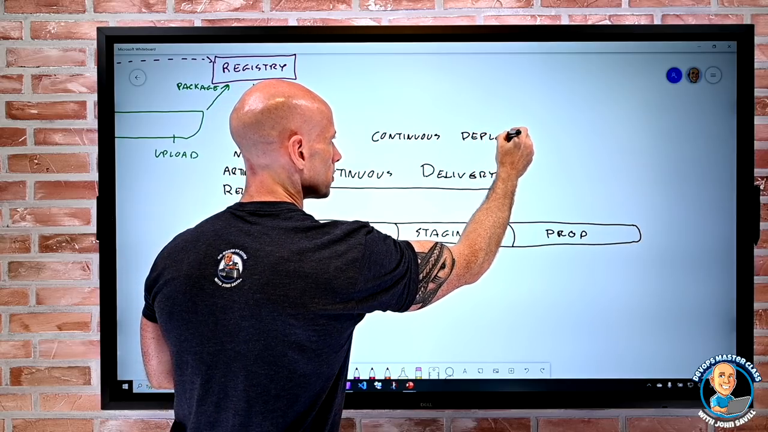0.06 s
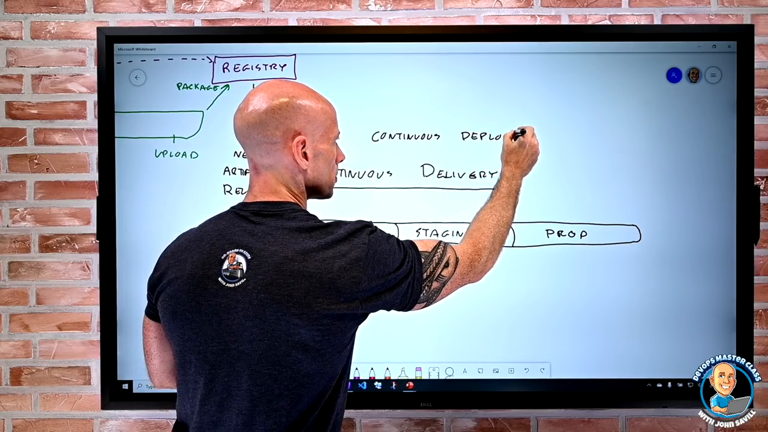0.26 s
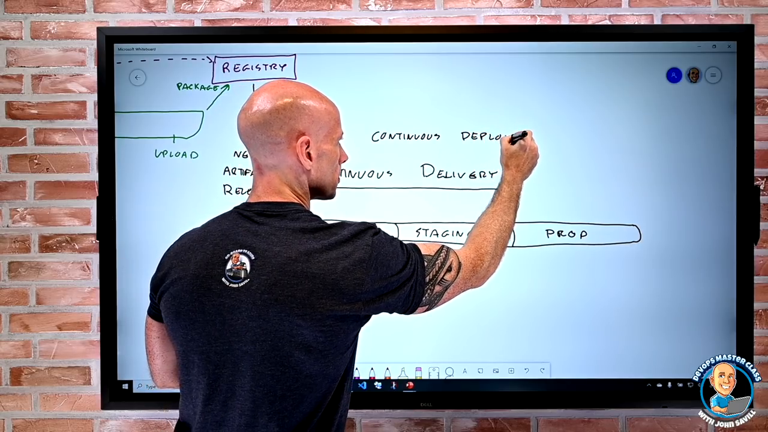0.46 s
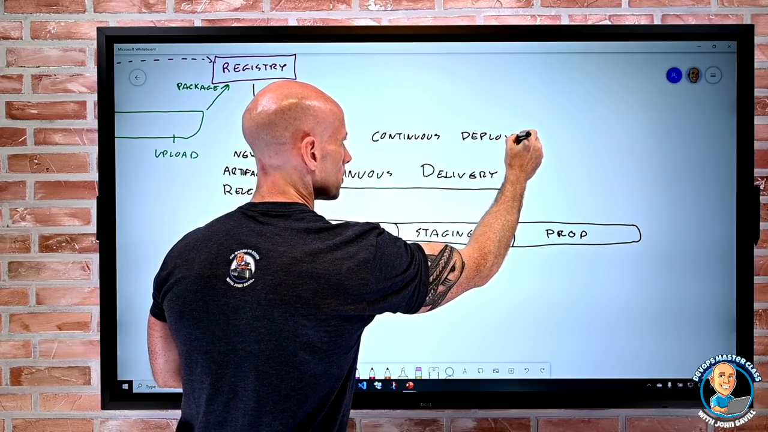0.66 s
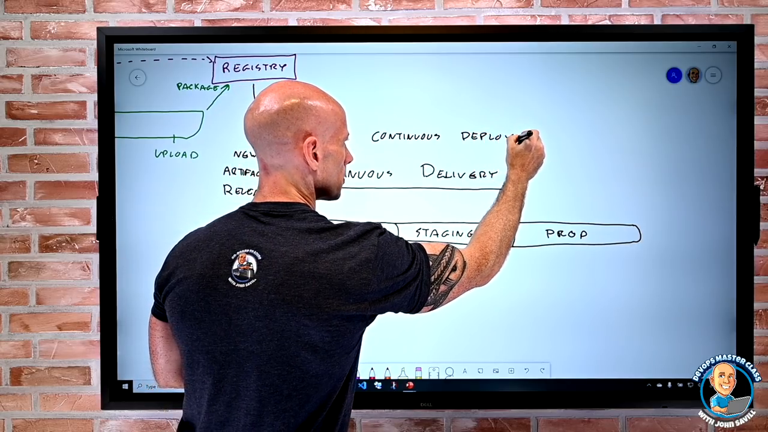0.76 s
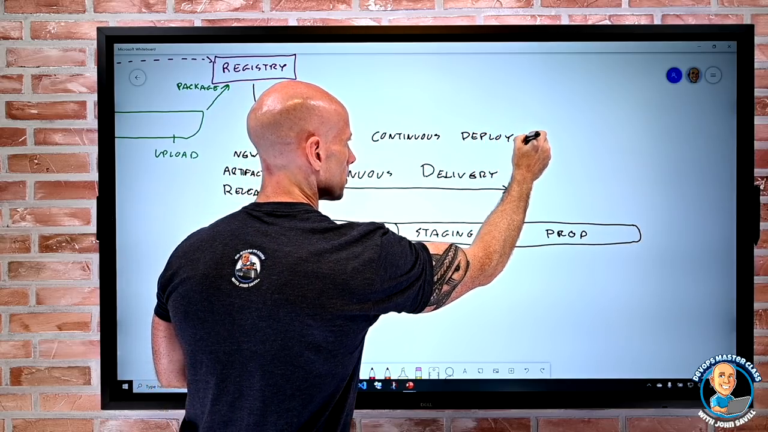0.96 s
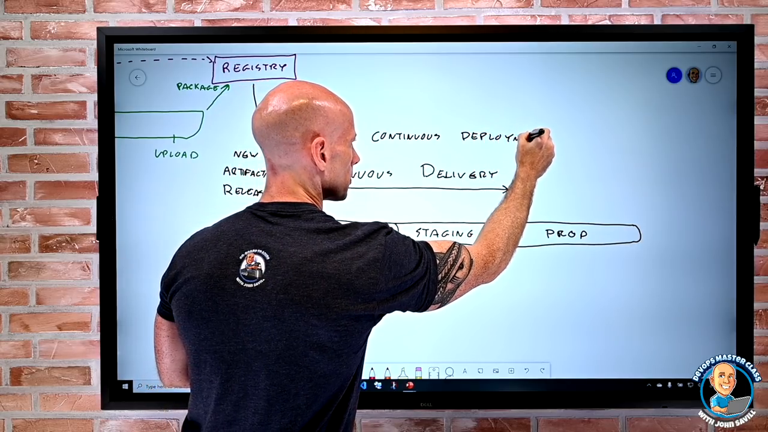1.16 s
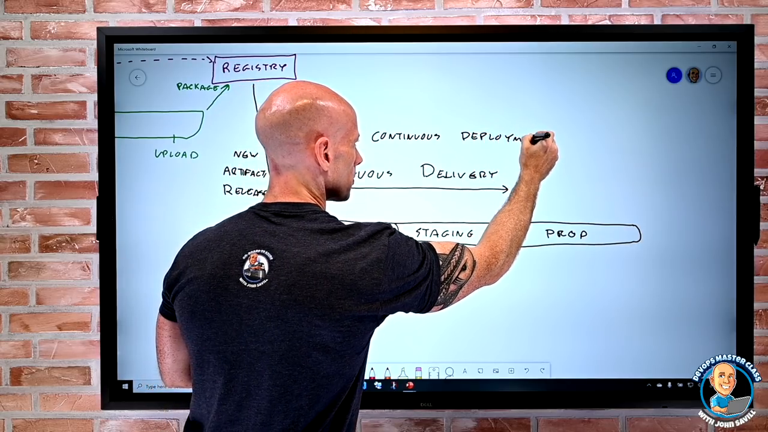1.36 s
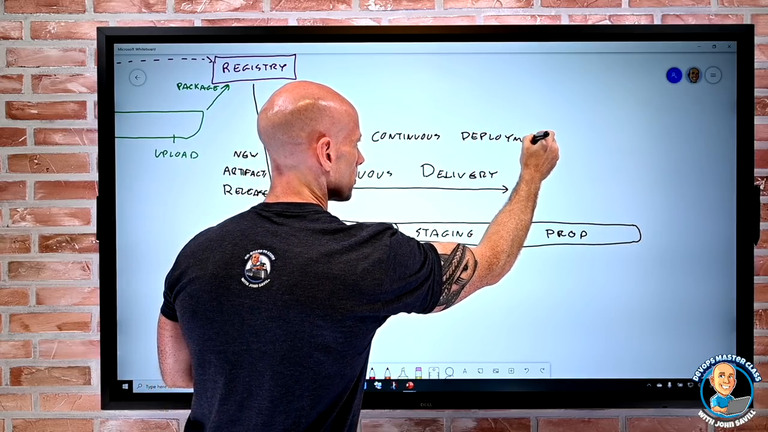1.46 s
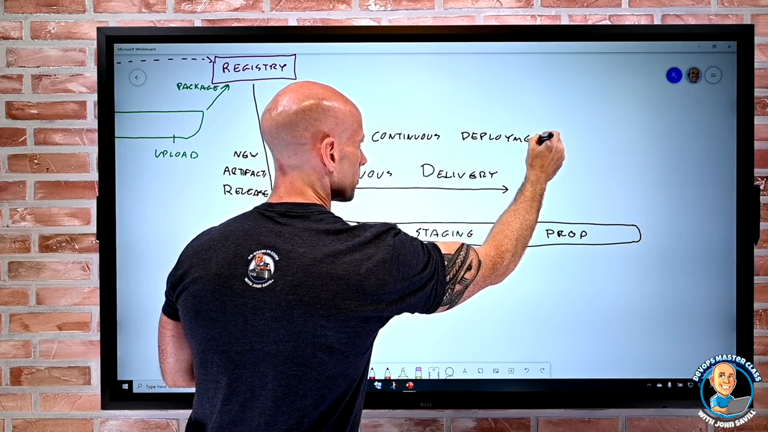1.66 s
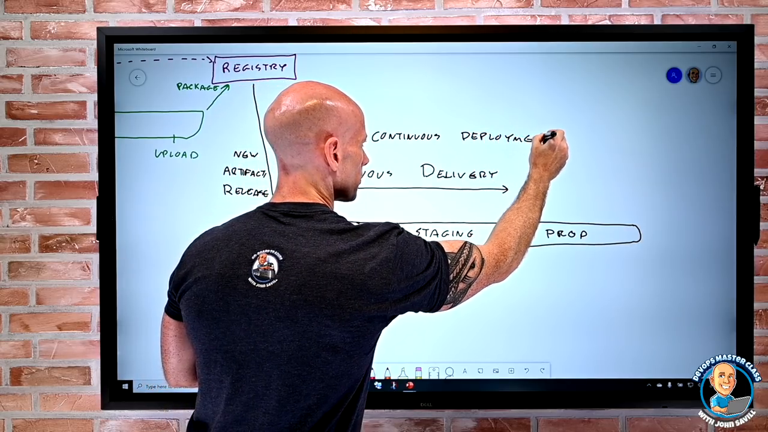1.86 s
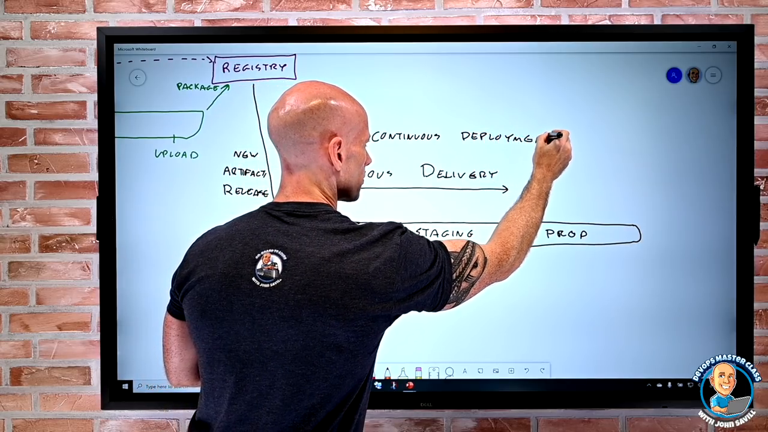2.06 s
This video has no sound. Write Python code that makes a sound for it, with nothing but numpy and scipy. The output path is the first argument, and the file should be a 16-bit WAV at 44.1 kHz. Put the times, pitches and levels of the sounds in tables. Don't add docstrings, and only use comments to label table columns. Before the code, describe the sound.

Six sharp stylus taps on a big glass panel, with soft thumps between and faint electrical buzz

```python
import sys
import numpy as np
from scipy import signal
from scipy.fft import rfft, irfft, next_fast_len
from scipy.io import wavfile
from scipy.ndimage import uniform_filter1d

SR = 44100
rng = np.random.default_rng(int(sys.argv[2]) if len(sys.argv) > 2 else 0)


def invert_db(level):
    return 10 ** (np.asarray(level, dtype=float) / 20)


def pcm_store(signal):
    levels = np.round(np.clip(np.atleast_2d(signal), -1, 1) * 32767)
    wavfile.write(sys.argv[1], SR, levels.astype(np.int16).T)


N = 92610


def along(points, hz):
    point_hz, value = np.transpose(points)
    return np.interp(np.log(hz + 1), np.log(point_hz + 1), value)


def filtered(x, response):
    size = next_fast_len(len(x) + 8192)
    return irfft(rfft(x, size) * response(np.fft.rfftfreq(size, 1 / SR)), size)[:len(x)]


def add(track, start_s, sound):
    track[round(start_s * SR):][:len(sound)] += sound


def ring(t, hz, db, t60, phase=0):
    return (t > 0) * invert_db(db - 60 * np.abs(t) / t60) * np.sin(2 * np.pi * hz * t + phase)


def contact_knock(t):
    tick_leads_s = 0.00012
    return -ring(t - tick_leads_s, hz=720, db=7.5, t60=0.0065)


def contact_tick(t, bright_db):
    # pitch_hz, level_db, t60_s
    tick_modes = [(4100, -5.5, 0.0023), (1390, -23.5, 0.0041), (8100, -23.5, 0.00051)]
    return invert_db(bright_db) * sum(ring(t, hz, db, t60) for hz, db, t60 in tick_modes)


def glass_panel(t, place):
    # pitch_hz, level_db at place 0, level_db at place 1, t60_s
    panel_modes = [(156.2, -7, -7, 0.15), (189, -10.5, -19, 0.17), (230.5, -17.5, -7.5, 0.36),
                   (330.4, -16.5, -7, 0.12), (412.3, -19, -8, 0.36), (459.3, 2, -8, 0.17),
                   (526.4, -15, -15.5, 0.28), (557, 4, -6.5, 0.12), (581, -7.5, -15, 0.09),
                   (709.4, -10.5, -5, .09), (877, -9, -5.5, 0.068), (935, -7, -17.5, .08),
                   (1117, -14.5, -19, 0.059), (1382, -19, -19, 0.084)]
    delay_s, rise_s, level_db, scatter_db = 0.002095, 0.002, -3.5, 2
    late = t - delay_s
    glass = np.zeros(len(t))
    for k, (hz, db_0, db_1, t60) in enumerate(panel_modes):
        db = db_0 + place * (db_1 - db_0) + rng.normal(0, scatter_db)
        glass += (-1) ** k * ring(late, hz, db, t60)
    swell = 1 - np.exp(-np.abs(late) / rise_s)
    return invert_db(level_db) * swell * glass


def room_tail(bright_db):
    # pitch_hz, t60_s
    room_decay = [(150, 0.58), (400, 0.32), (1000, 0.14), (2500, 0.14), (5000, 0.11), (10000, 0.048)]
    # pitch_hz, rise_s
    room_rise = [(300, 0.012), (800, 0.021), (1600, 0.0025), (8000, 0.00067)]
    # pitch_hz, level_db
    room_colour = [(90, -13), (170, -6), (450, -5), (1000, -10.5), (2000, -30.5), (4000, -29),
                   (6000, -37.5), (9000, -45)]
    bright_above_hz = 3100
    hz, t, grains = signal.stft(rng.standard_normal(SR // 2), SR, nperseg=128)
    decay = invert_db(-60 * t / along(room_decay, hz)[:, None])
    swell = 1 - np.exp(-t / along(room_rise, hz)[:, None])
    noise = signal.istft(grains * decay * swell, SR, nperseg=128)[1]
    tail = filtered(noise, lambda f: invert_db(along(room_colour, f)))
    return filtered(tail, lambda f: invert_db(bright_db * f ** 2 / (f ** 2 + bright_above_hz ** 2)))


def taps():
    # start_s, peak level_db, place on the glass (0-1), brightness_db
    tap_events = [
        (0.2005, -27, 0.43, -0.2),
        (0.5164, -26.5, 0.32, 0.1),
        (0.7457, -26, 0.14, -2.2),
        (1.1975, -30, 0.75, -5.5),
        (1.5313, -28.5, 0.55, -0.9),
        (1.7452, -27, 0.61, -5.5),
    ]
    # delay_s, level_db at place 0, level_db at place 1
    wall_echoes = [(.0024, -17.5, -15), (.0066, -8.5, -7), (.0078, -19, -25), (0.011, -12.5, -19),
                   (0.021, -13.5, -19.5), (.031, -21, -11.5)]
    wall_dulls_db_per_s = -350
    room_db, room_delay_s = 9.5, 0.0015
    out = np.zeros(N + SR)
    t = np.arange(SR // 2) / SR
    for start_s, db, place, bright_db in tap_events:
        knock = contact_knock(t)
        tick = contact_tick(t, bright_db)
        add(out, start_s, invert_db(db) * (knock + tick + glass_panel(t, place)))
        for delay_s, db_0, db_1 in wall_echoes:
            echo = knock + invert_db(wall_dulls_db_per_s * delay_s) * tick
            echo_db = db + db_0 + place * (db_1 - db_0)
            add(out, start_s + delay_s, invert_db(echo_db) * echo)
        add(out, start_s + room_delay_s, invert_db(db + room_db) * room_tail(bright_db))
    return out[:N]


def lifts():
    # start_s, level_db, rise_s
    lift_events = [
        (.001, -63.5, 0.0024),
        (.296, -54.5, .012),
        (.967, -59, 0.0025),
        (1.081, -84, 0.0082),
        (1.38, -56.5, 0.012),
        (1.854, -53, .006),
        (1.962, -56, 0.019),
    ]
    # pitch_hz, level_db
    lift_colour = [(150, -55), (300, 7), (560, 7), (800, -1), (1200, -31), (3000, -30.5)]
    t60_s = 0.08
    out = np.zeros(N + SR)
    t = np.arange(SR // 4) / SR
    for start_s, db, rise_s in lift_events:
        thump = filtered(rng.standard_normal(len(t)), lambda f: invert_db(along(lift_colour, f)))
        envelope = invert_db(db - 60 * t / t60_s) * (1 - np.exp(-t / rise_s))
        add(out, start_s, envelope * 2 * thump / thump.std())
    return out[:N]


def mains():
    # delay_s, level_db, pitch_hz, t60_s, phase_rad
    spike_rings = [(0.0029, -59.5, 500, 0.0041, 2.1), (0, -65.5, 3210, 0.0043, 0.3),
                   (0.00063, -71, 5400, 0.0013, 0.072), (0.0044, -72, 1400, 0.0013, 0.18),
                   (0, -61, 14000, 0.00026, 1.1)]
    # multiple of the mains frequency, level_db
    hum_partials = [(1, -78), (3, -73.5), (5, -78), (7, -92.5), (11, -93.5), (13, -95.5), (15, -92.5)]
    mains_hz, first_spike_s = 60, 0.00204
    scatter_db, jitter_s = 1.5, 0.000012
    t = np.arange(N) / SR - first_spike_s
    half = np.floor(t * 2 * mains_hz)
    chance = rng.standard_normal((N // 256, 2))[half.astype(int) + 1]
    since_spike = t - half / (2 * mains_hz) - jitter_s * np.abs(chance[:, 0])
    buzz = np.zeros(N)
    for delay_s, db, hz, t60, phase in spike_rings:
        buzz += ring(since_spike - delay_s, hz, db, t60, phase)
    sign = 2 * (half % 2) - 1
    buzz *= sign * invert_db(scatter_db * chance[:, 1])
    hum = np.zeros(N)
    for multiple, db in hum_partials:
        phase = rng.uniform(0, 6.84)
        hum += np.sqrt(2) * invert_db(db) * np.sin(2 * np.pi * round(multiple) * mains_hz * t + phase)
    return buzz + hum


def air():
    # pitch_hz, level_db per Hz
    air_colour = [(25, -17.5), (85, -18.5), (110, -11), (190, -4), (480, -13.5), (1050, -24), (2500, -29),
                  (15500, -40.5)]
    level_db, patch_db = -71, 0.4
    grains = signal.stft(rng.standard_normal(N), nperseg=512)[2]
    patches = uniform_filter1d(rng.standard_normal(grains.shape), 6, 0)
    patches = uniform_filter1d(patches, 10, 1)
    noise = signal.istft(grains * invert_db(patch_db * patches / patches.std()), nperseg=512)[1][:N]
    noise = filtered(noise, lambda f: invert_db(along(air_colour, f)))
    return invert_db(level_db) * noise / noise.std()


def scene():
    tip_cut_hz, low_cut_hz, air_trim_db = 7200, 120, -0.7

    def low_pass(u):
        return 1 / ((1 + 1j * u - u ** 2) * (1 + 2j * u - u ** 2))

    def tip_and_microphone(f):
        return low_pass(f / tip_cut_hz) * low_pass(-low_cut_hz / (f + 1))

    stylus = filtered(taps() + lifts(), tip_and_microphone)
    return (stylus + mains() + invert_db(air_trim_db) * air())[None]


def top_cut(x):
    return signal.sosfilt(signal.butter(12, 15640, fs=SR, output="sos"), x)


def record(dry):
    return top_cut(dry)


dry = scene()
out = record(dry)
pcm_store(out)
```